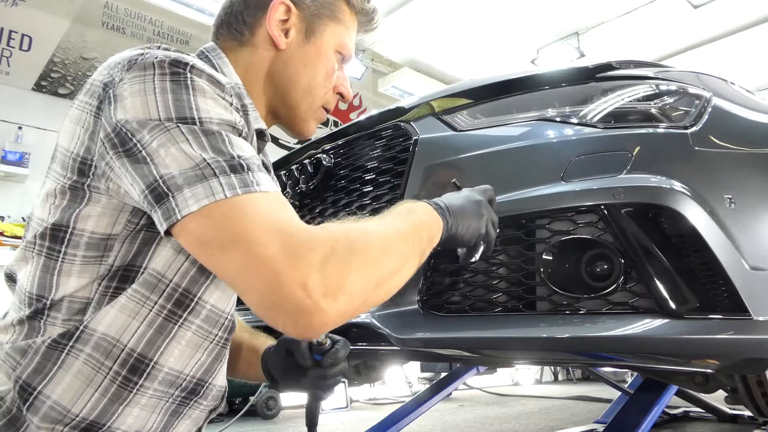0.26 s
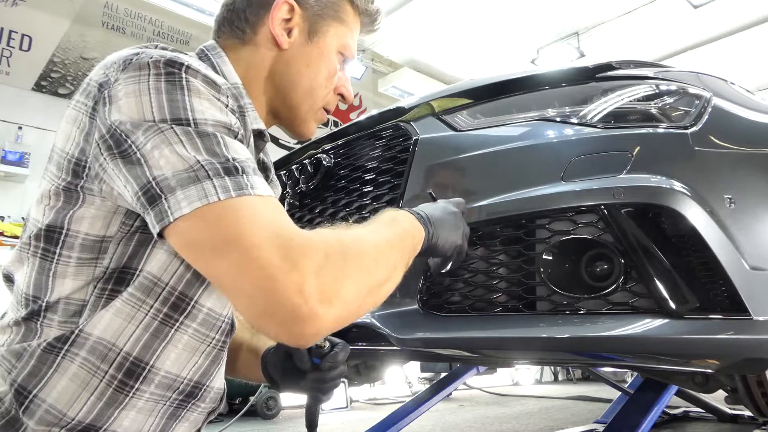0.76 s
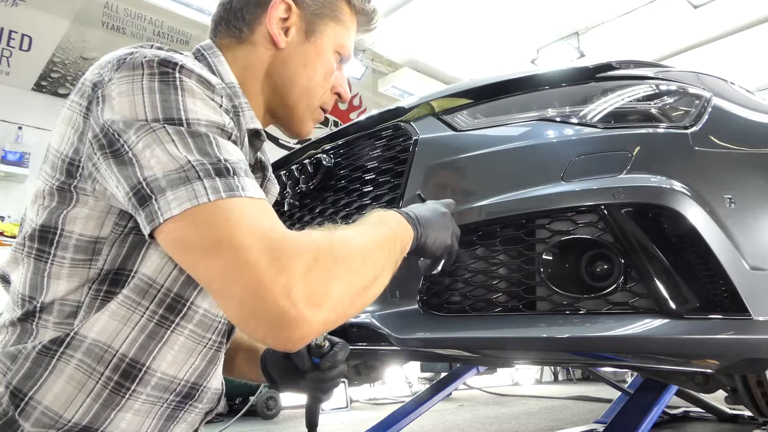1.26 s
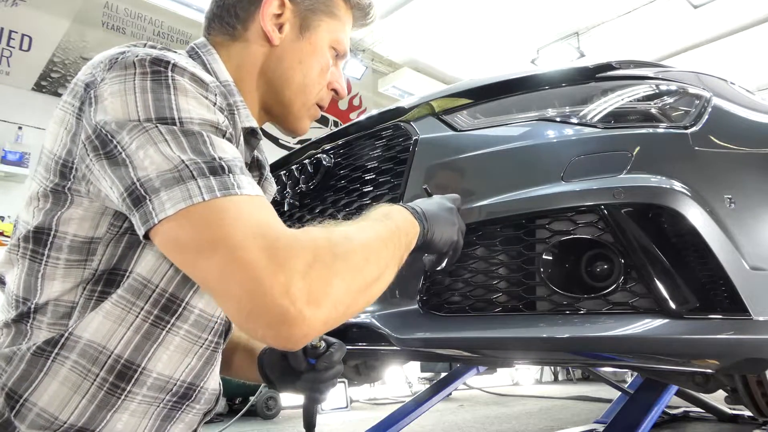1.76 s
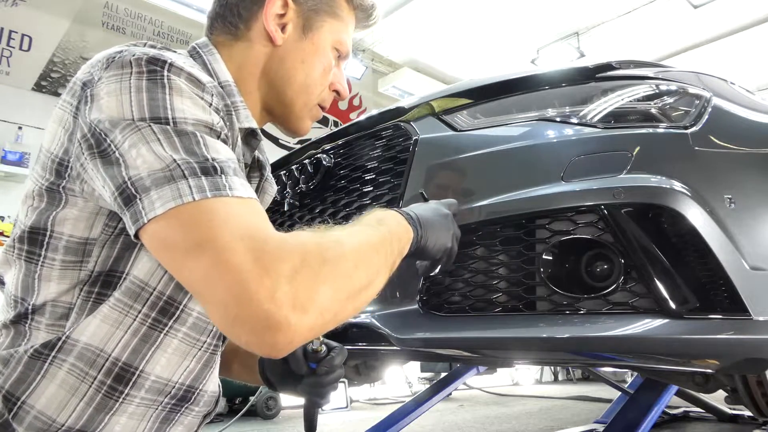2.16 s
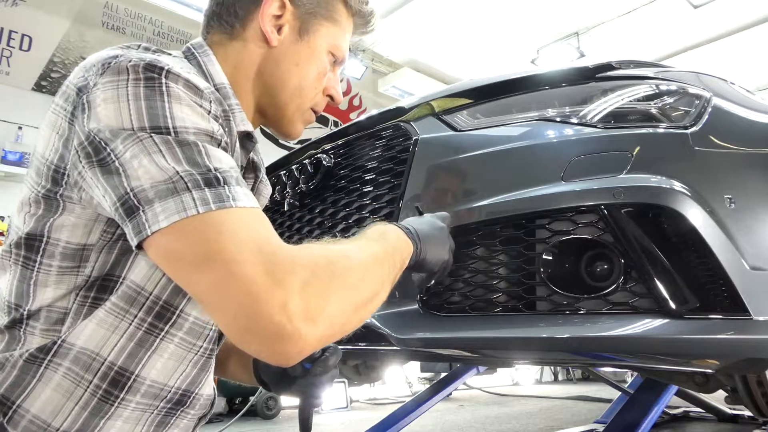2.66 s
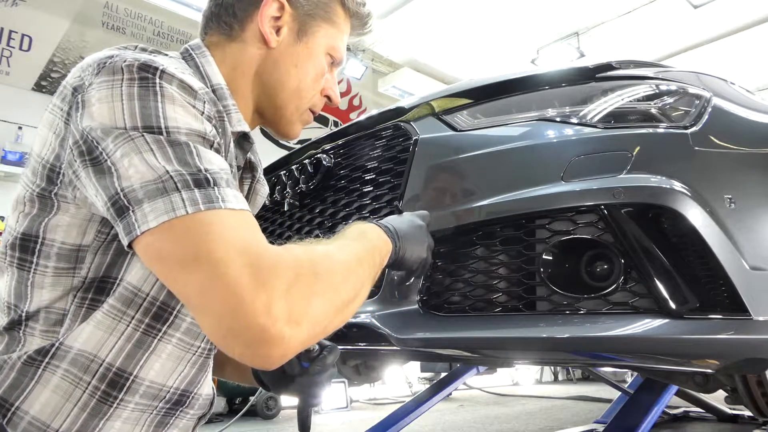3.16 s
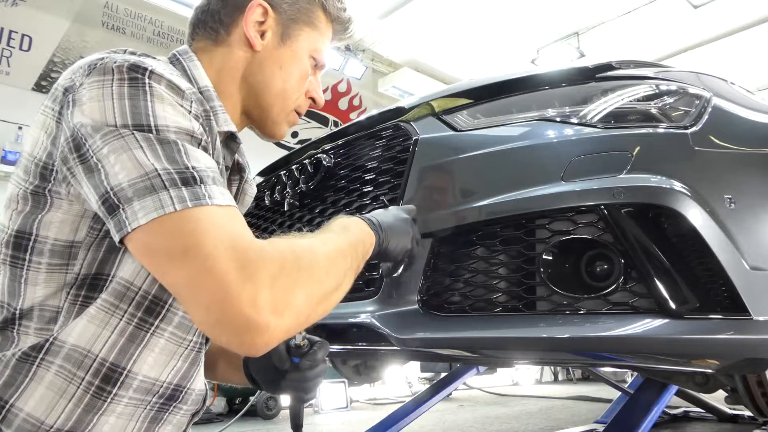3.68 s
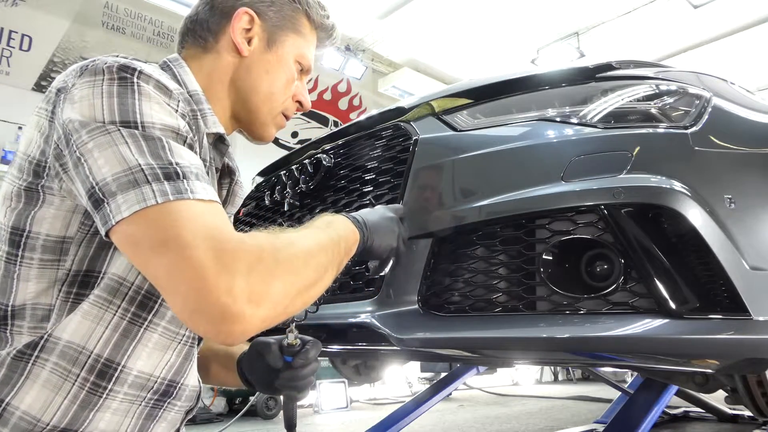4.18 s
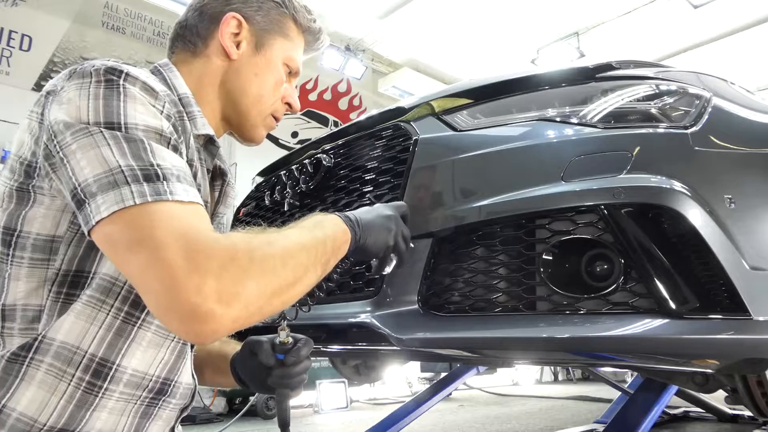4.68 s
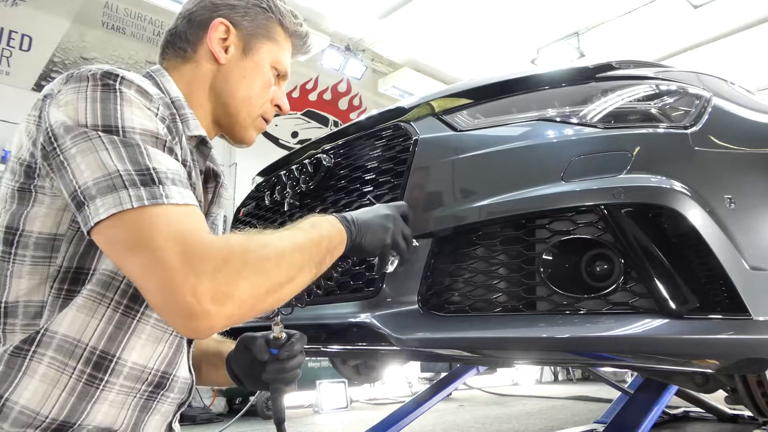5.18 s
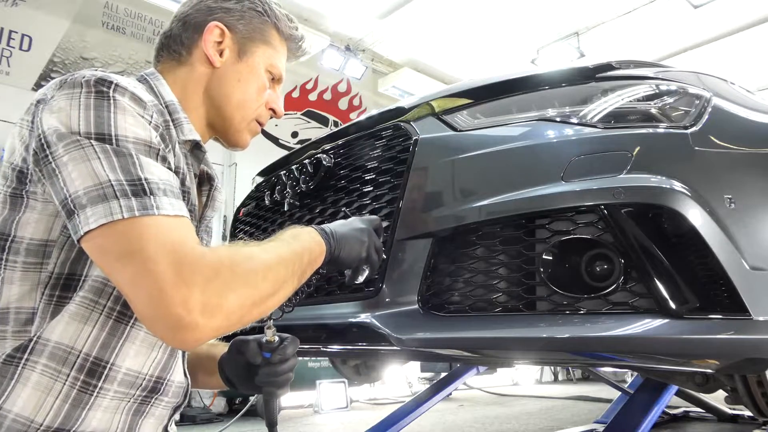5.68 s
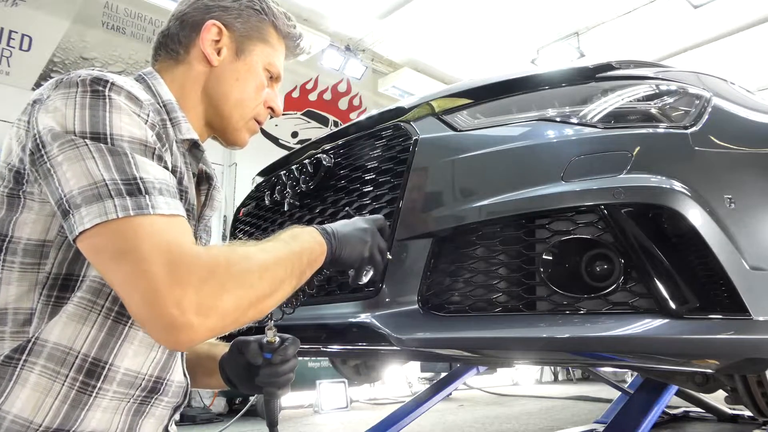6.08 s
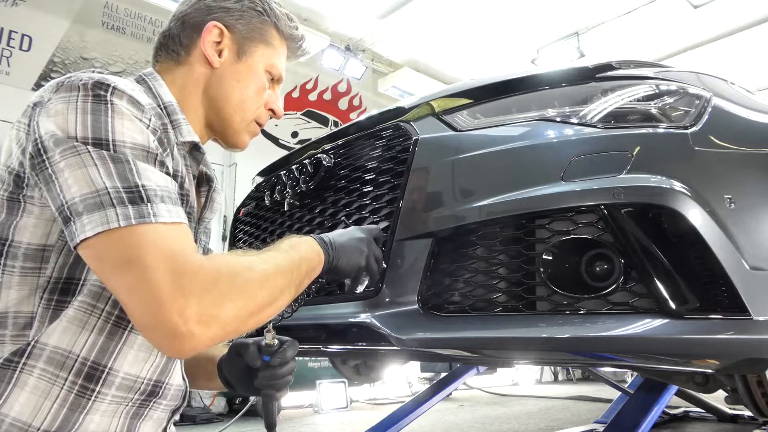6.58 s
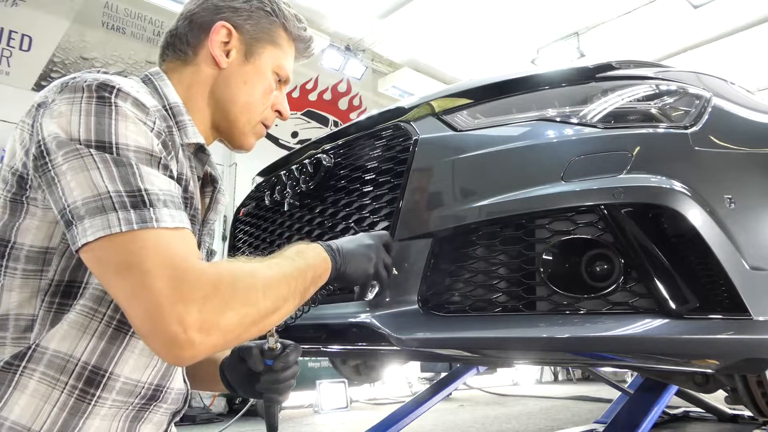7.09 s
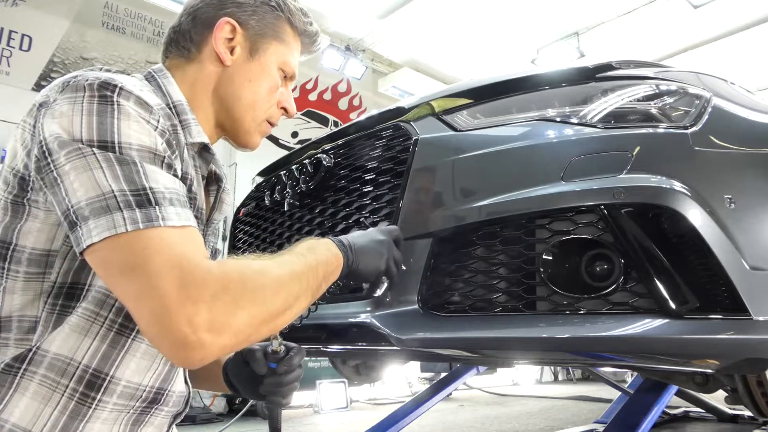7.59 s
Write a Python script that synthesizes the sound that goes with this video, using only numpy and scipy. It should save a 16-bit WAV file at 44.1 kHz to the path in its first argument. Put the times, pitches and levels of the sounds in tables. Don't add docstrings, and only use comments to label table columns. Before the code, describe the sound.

In a hard-walled workshop, an airbrush sprays a car bumper in eleven quick, bright hisses, each just over a tenth of a second. They come closer together at first, then with longer pauses. Every burst has tight reflections and a fading room tail. Steady fan air, a faint whine and a distant machine rumble continue beneath. The stereo microphone is fairly close, with the spray almost centered.

```python
import sys
import numpy as np
from scipy import signal
from scipy.io import wavfile
from scipy.ndimage import uniform_filter1d

SR = 44100
rng = np.random.default_rng(int(sys.argv[2]) if len(sys.argv) > 2 else 0)


def level_to_linear(level):
    exponent = np.asarray(level, float) / 20
    return 10 ** exponent


def file_out(sig):
    cols = np.atleast_2d(sig).T
    lim = np.clip(cols, -1, 1)
    pcm = np.round(lim * 32767).astype(np.int16)
    wavfile.write(sys.argv[1], SR, pcm)


N = 345744
LEAD = SR // 2


def evened(x):
    return x / np.sqrt(np.mean(x ** 2) + 1e-20)


def read(points, hz):
    point_hz, value = np.transpose(points)
    return np.interp(np.log(hz + 1), np.log(point_hz + 1), value)


def bump(hz, centre_hz, width_hz):
    return np.exp(-((hz - centre_hz) / width_hz) ** 2)


def noise_pair(field_db, likeness, hop, size):
    bins, frames = field_db.shape
    a, b, c, d = rng.standard_normal((frames, bins, 4)).T
    likeness = np.clip(likeness, -1, 1)[:, None]
    left = a + 1j * b
    right = likeness * left + np.sqrt(1 - likeness ** 2) * (c + 1j * d)
    spectra = np.array([left, right]) * level_to_linear(field_db)
    sound = signal.istft(spectra, nperseg=4 * hop, noverlap=3 * hop)[1]
    return evened(sound[:, :size])


def drift(shape, bins, frames):
    field = rng.standard_normal(shape[::-1]).T
    field = uniform_filter1d(field, bins, 0)
    return evened(uniform_filter1d(field, frames, 1))


def airbrush():
    # start_s, jet_db, opening_ms, held_ms, closing_ms
    presses = [(-.33, -32.5, 6, 89, 11), (0.1867, -33.5, 4.8, 115.4, 15), (.812, -33.5, 4.2, 114, 12),
               (1.272, -35, 5, 110, 25), (1.887, -34, 3.6, 97, 20), (2.743, -34, 6.5, 107, 13.5),
               (3.837, -34, 6.4, 114.5, 12.4), (4.366, -33.5, 6.6, 115, 10), (5.0875, -33.5, 4.2, 107, 19),
               (5.826, -32.5, 4.1, 127.6, 18), (6.8556, -33, 6.1, 125, 21), (7.3507, -33, 7.3, 123.6, 22.6)]
    # delay_s, level_db, left_minus_right_db
    echoes = [(.00041, -44, -12), (.0021, -43, -12.5), (.0057, -16, 12), (.0094, -14.5, -12.5),
              (0.016, -16, 1)]
    jet = np.zeros((3, LEAD + N + SR))
    for press in presses:
        sound = burst(*press)
        at = LEAD + round(press[0] * SR)
        jet[:, at:at + sound.shape[1]] += sound
    direct, sideways = jet[:2], jet[2:]
    near = np.zeros_like(direct)
    for delay_s, level_db, pan_db in echoes:
        sides = level_to_linear([[level_db + pan_db / 2], [level_db - pan_db / 2]])
        near += np.roll(direct, round(delay_s * SR), 1) * sides
    return direct + near, sideways


def burst(start_s, jet_db, opening_ms, held_ms, closing_ms):
    # pitch_hz, likeness
    jet_same = [(700, 0.3), (1400, 0.72), (2500, 0.99), (4000, 0.95), (7000, 0.97), (11000, 0.91),
                (15000, 0.68)]
    size = SR // 3
    hz, t = np.fft.rfftfreq(1024, 1 / SR), np.arange(size) / SR
    shape = (513, size // 256 + 5)
    plain_db, aim_db, dip_db = jet_colour(hz, start_s)
    patches_db = 2.1 * drift(shape, 5, 9)
    ahead_db = (plain_db + aim_db + dip_db)[:, None] + patches_db
    hiss = noise_pair(ahead_db, read(jet_same, hz), hop=256, size=size)
    hall_db = (plain_db + 0.15 * aim_db + 0.25 * dip_db)[:, None] + np.zeros(shape)
    sideways = noise_pair(hall_db, np.ones(513), hop=256, size=size)[:1]

    eddies = np.exp(0.12 * evened(uniform_filter1d(rng.standard_normal(size), size=40)))
    opened = (1 - np.exp(-t * 1000 / opening_ms)) ** 2
    shut = np.exp(-np.maximum(t * 1000 - held_ms, 0) / closing_ms)
    flow = opened * shut * level_to_linear(jet_db - 0.5 * np.exp(-t / 0.06))
    low = wash(hz, t, shape, jet_db) * shut
    return np.vstack([evened(hiss * eddies) * flow + low, sideways * flow + low[:1]])


def jet_colour(hz, start_s):
    # pitch_hz, level_db (per Hz)
    jet_hiss = [(400, -23), (850, -26.5), (1300, -15.5), (1700, -16), (2500, -12), (3500, -7), (5000, -6),
                (6900, -3.5), (8100, -6), (9500, -2.5), (11300, -2.5), (13500, -2.5), (15600, -7),
                (16400, -6)]
    # time_s, nearest_gap_hz, middle_gap_db, edge_hiss_hz, tilt_db (per octave)
    aim_path = [(0.19, 2150, 2.5, 12000, 0.16), (.81, 2240, -2, 12000, 0.25), (1.27, 2130, -1, 11100, -0.8),
                (1.89, 2150, 0, 10800, 0), (2.74, 2120, 3.5, 11400, .2), (3.84, 2240, 0, 9600, 0.53),
                (4.37, 2330, -2, 9900, 0.77), (5.09, 1840, -2.5, 9850, .5), (5.83, 2230, -2, 11200, 0.95),
                (6.86, 1890, 5, 10400, 0.57), (7.35, 2430, 2.5, 10400, 0.5)]
    # usual_hz, usual_db, shift_hz and shift_db (per kHz of nearest gap)
    hollows = [(2190, 9.5, 998, 14), (2950, 3.95, -150, -2), (3930, 2.05, 900, 2.5)]
    hollow_width_hz = 213
    time_s, *aim = np.transpose(aim_path)
    gap_hz, middle_db, edge_hz, tilt_db = (np.interp(start_s, time_s, column) for column in aim)
    plain_db = read(jet_hiss, hz) + tilt_db * np.log2((hz + 1) / 8000)

    shift_khz = (gap_hz - 2200) / 1000
    aim_db = 2.5 * bump(hz, edge_hz, 1630)
    aim_db += middle_db * bump(hz, 3070, hollow_width_hz)
    for usual_hz, usual_db, shift_hz, shift_db in hollows:
        ring_hz = usual_hz + shift_khz * shift_hz
        aim_db += (usual_db + shift_khz * shift_db) * bump(hz, ring_hz, hollow_width_hz)

    dip_db = (-14 - 2.2 * middle_db) * bump(hz, 3670, 130)
    return plain_db, aim_db, dip_db


def wash(hz, t, shape, jet_db):
    # pitch_hz, level_db (per Hz)
    wash_colour = [(50, -39), (110, -1.5), (250, -3.5), (550, 5.5), (900, -2), (1600, -7), (3000, -48)]
    field_db = read(wash_colour, hz)[:, None] + np.zeros(shape)
    rush = noise_pair(field_db, np.full(513, .3), hop=256, size=len(t))
    wash_db = -61 + 2 * (jet_db + 33.5)
    return rush * (1 - np.exp(-t / 0.014)) * level_to_linear(wash_db)


def hall(x):
    # pitch_hz, ring_s
    hall_ring = [(100, 1), (1000, 1), (3000, 0.82), (6000, 0.76), (9000, 0.52), (13000, 0.37),
                 (16000, 0.37)]
    # pitch_hz, level_db
    hall_colour = [(100, 6), (1000, -3), (3000, -4), (7000, -6), (11000, -4.5), (16000, -15)]
    # pitch_hz, likeness
    hall_same = [(100, .1), (1000, 0.1), (3000, 0.7), (7000, 0.8), (15000, 0.43)]
    hz, t = np.fft.rfftfreq(256, 1 / SR), np.arange(SR // 64 + 5) * 64 / SR
    tail = noise_pair(np.zeros((129, len(t))), read(hall_same, hz), hop=64, size=SR)
    z = signal.stft(tail, SR, nperseg=256, noverlap=192)[2]
    ring_s, t = read(hall_ring, hz)[:, None], t[:z.shape[2]]
    decay = level_to_linear(read(hall_colour, hz)[:, None] - 60 * t / ring_s)
    decay = decay * (1 - np.exp(-t / 0.0036))
    decay = decay / np.sqrt(SR * ring_s / (2 * np.log(1000)))
    tail = signal.istft(z * decay, SR, nperseg=256, noverlap=192)[1]
    return signal.fftconvolve(x.mean(0)[None], tail, axes=1)[:, :x.shape[1]]


def moving_hall(sideways):
    turn = np.pi * 0.6 * np.arange(sideways.shape[1]) / SR
    ring = 0
    for k in range(3):
        share = np.sqrt(2 / 3) * np.cos(turn + k * np.pi / 3)
        ring = ring + hall(sideways * share)
    return ring


def ventilation():
    # pitch_hz, level_db (per Hz)
    air_colour = [(18, -34), (45, -18), (105, -7), (270, -7.5), (600, -9.5), (930, -14.5), (1260, -14),
                  (1850, -19.5), (2200, -19), (3800, -24), (6000, -27), (8000, -29.5), (10800, -26.5),
                  (15800, -33.5)]
    # pitch_hz, likeness
    air_same = [(60, -0.34), (130, -0.23), (290, -0.53), (640, 0.37), (1410, -0.24), (3100, 0.095),
                (6820, 0.52), (15000, 0.34)]
    hz, shape = np.fft.rfftfreq(4096, 1 / SR), (2049, N // 1024 + 5)
    field_db = (read(air_colour, hz) + standing(hz))[:, None] + 0.36 * drift(shape, 40, 4)
    air = level_to_linear(-63) * noise_pair(field_db, read(air_same, hz), hop=1024, size=N)
    return air + whine()


def whine():
    # time_s, pitch_hz, level_db
    whine_path = [
        (0, 2770, -84),
        (1.2, 2780, -78),
        (6.5, 2800, -82.5),
        (7.84, 2860, -84),
    ]
    time_s, pitch_hz, level_db = np.transpose(whine_path)
    t = np.arange(N) / SR
    mid, side = resonate(rng.standard_normal((2, N)), np.interp(t, time_s, pitch_hz), width_hz=270)
    spread = 0.52
    tone = np.array([mid + spread * side, mid - spread * side])
    return tone * level_to_linear(np.interp(t, time_s, level_db))


def resonate(x, hz, width_hz):
    turn = np.exp(2j * np.pi * np.cumsum(hz * np.ones(N)) / SR)
    r = np.exp(-np.pi * width_hz / SR)
    smooth = signal.lfilter([1], np.convolve([1, -r], [1, -r]), x / turn)
    return evened((turn * smooth).real)


def rumble():
    # time_s, top_hz (upper edge of the rumble)
    speed_path = [
        (0, 790),
        (2.7, 820),
        (4.3, 776),
        (5.0, 810),
        (5.45, 760),
        (5.7, 860),
        (6.0, 1020),
        (6.7, 915),
        (7.3, 890),
        (7.84, 890),
    ]
    hz, frames = np.fft.rfftfreq(4096, 1 / SR)[:, None], N // 1024 + 5
    time_s, speed_hz = np.transpose(speed_path)
    level_db = -73.5 + 32 * (speed_hz - 800) / 1000
    top_hz = np.interp(np.arange(frames) * 1024 / SR, time_s, speed_hz)
    field_db = standing(hz) + 6.5 * bump(hz, top_hz, 120)
    field_db -= 60 * np.maximum(hz - top_hz, 0) / 100
    field_db -= 9 * np.maximum(420 - hz, 0) / 100
    band = noise_pair(np.maximum(field_db, -80), np.full(2049, .15), hop=1024, size=N)
    return band * level_to_linear(np.interp(np.arange(N) / SR, time_s, level_db))


def standing(hz):
    # pitch_hz, width_hz, level_db
    room_waves = [(100, 12, 4), (255, 14, 3), (353, 15, 5), (417, 14, 8), (479, 11, 10), (537, 12, -3),
                  (592, 13, 9.5), (632, 12, -4), (670, 20, 3), (1120, 40, -3), (1200, 25, 4), (2090, 40, 4),
                  (2500, 90, -5), (3400, 60, 3)]
    return sum(level_db * bump(hz, pitch_hz, width_hz) for pitch_hz, width_hz, level_db in room_waves)


def scene():
    jet, sideways = airbrush()
    balance = level_to_linear([[-.35], [.35]])
    wet = jet * balance + moving_hall(sideways)
    return wet[:, LEAD:LEAD + N] + ventilation() + rumble()


def band_limit(x):
    return signal.sosfilt(signal.butter(12, 16800, fs=SR, output="sos"), x)


def record(dry):
    treble_limit = signal.firwin(511, 15720, window=("kaiser", 9), fs=SR)
    limited = signal.oaconvolve(dry, treble_limit[None], "same")
    bass_cut = signal.butter(2, 24, "high", fs=SR, output="sos")
    return band_limit(signal.sosfilt(bass_cut, limited))


dry = scene()
out = record(dry)
file_out(out)
```